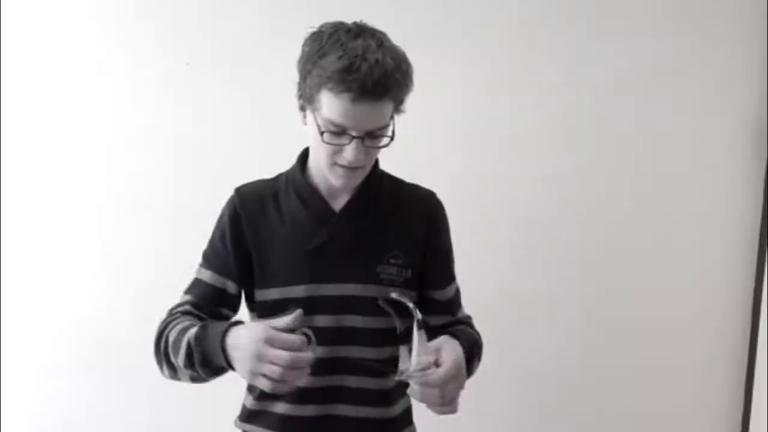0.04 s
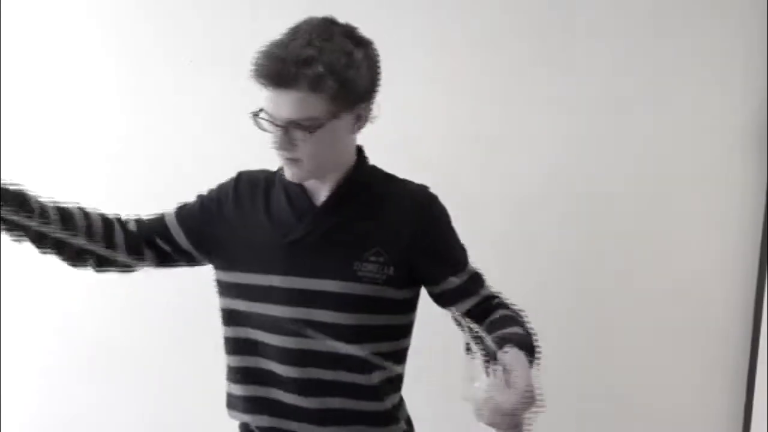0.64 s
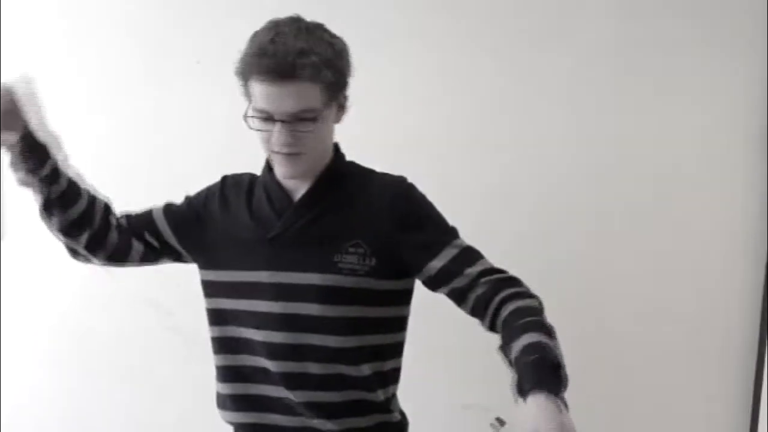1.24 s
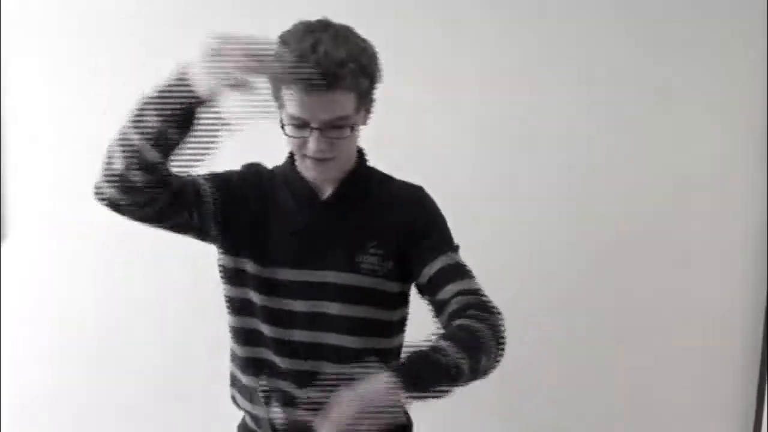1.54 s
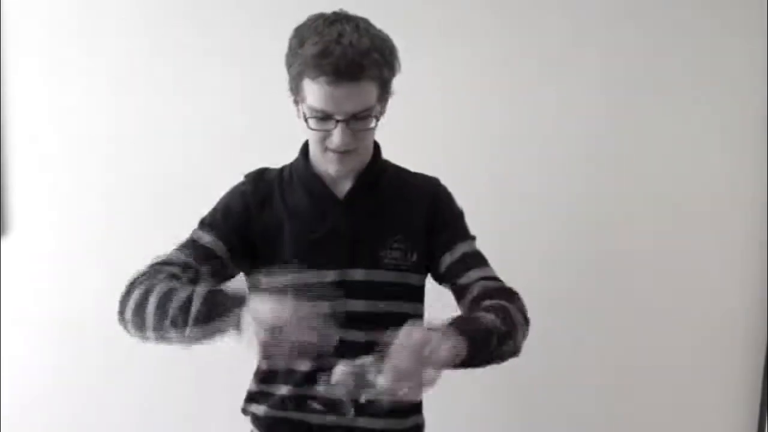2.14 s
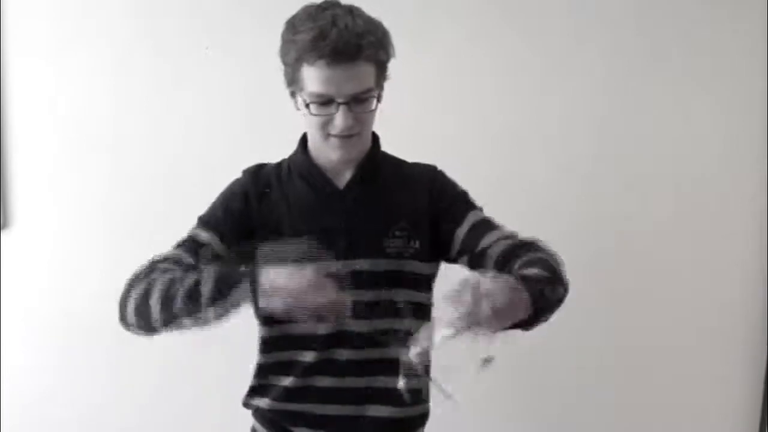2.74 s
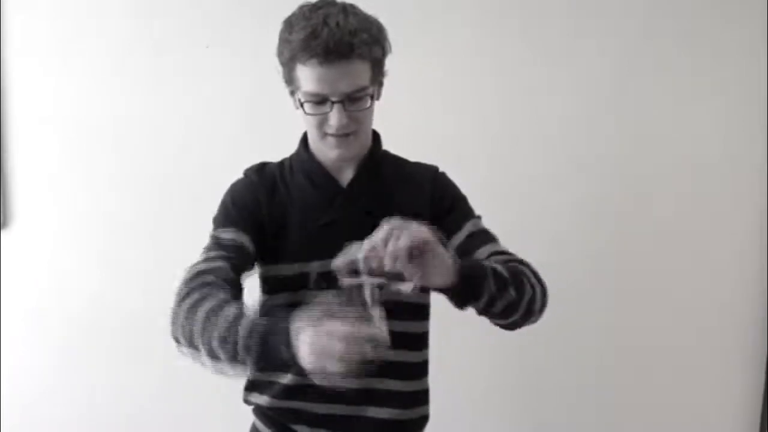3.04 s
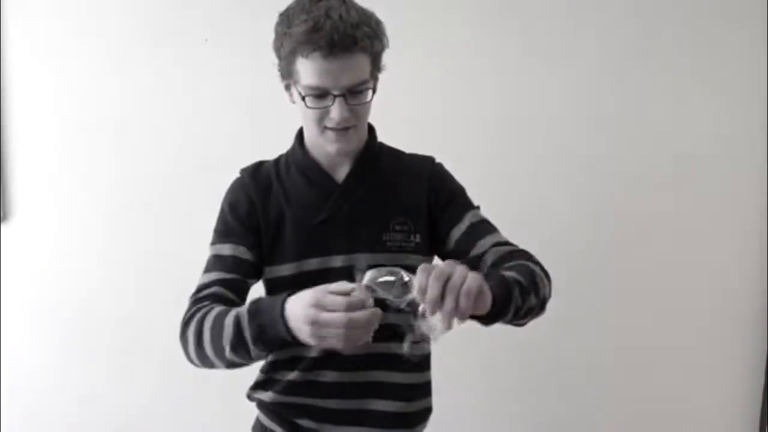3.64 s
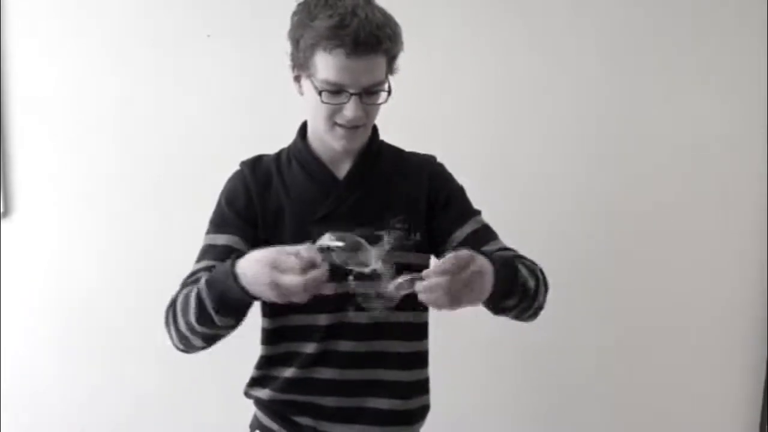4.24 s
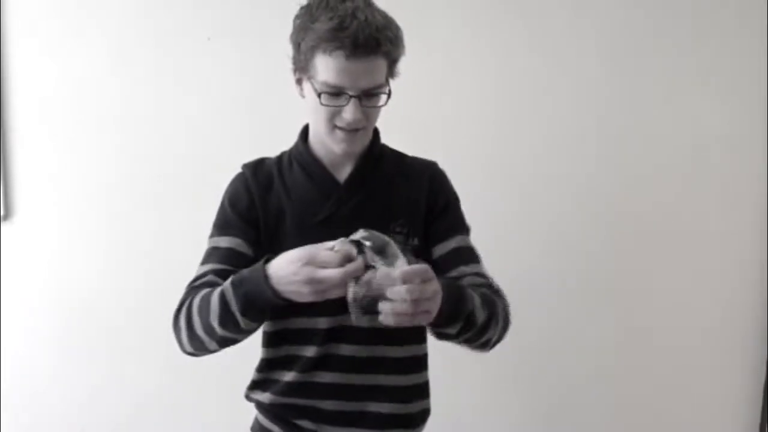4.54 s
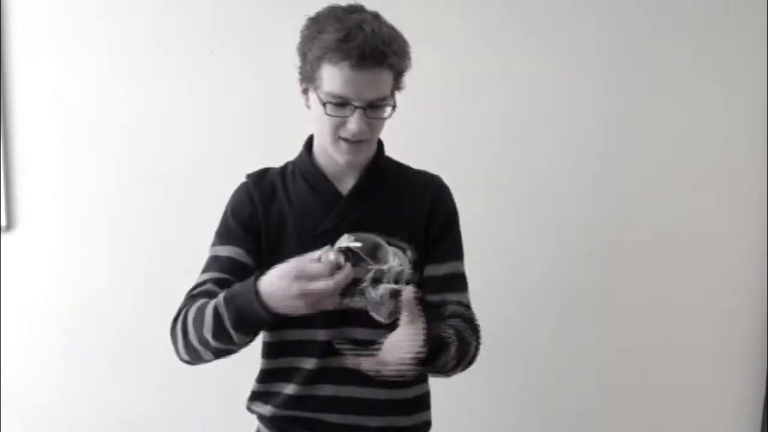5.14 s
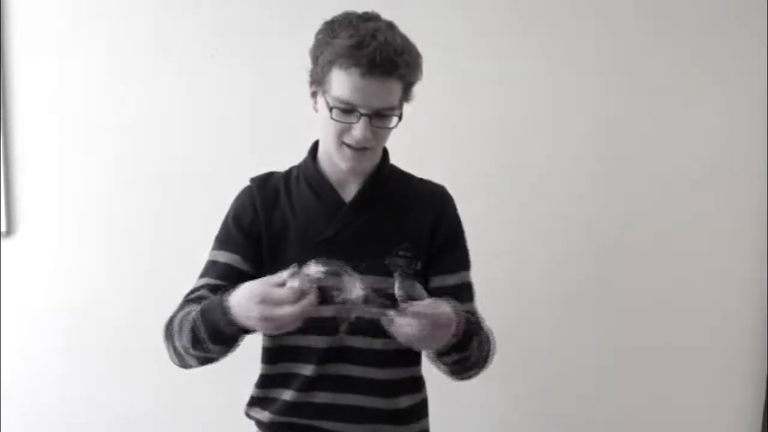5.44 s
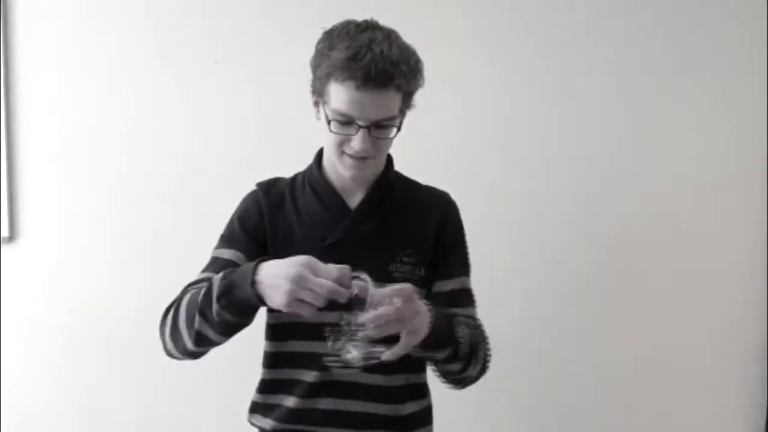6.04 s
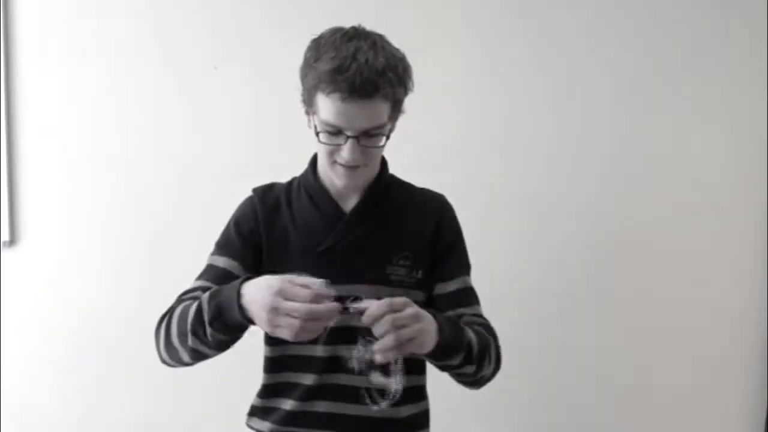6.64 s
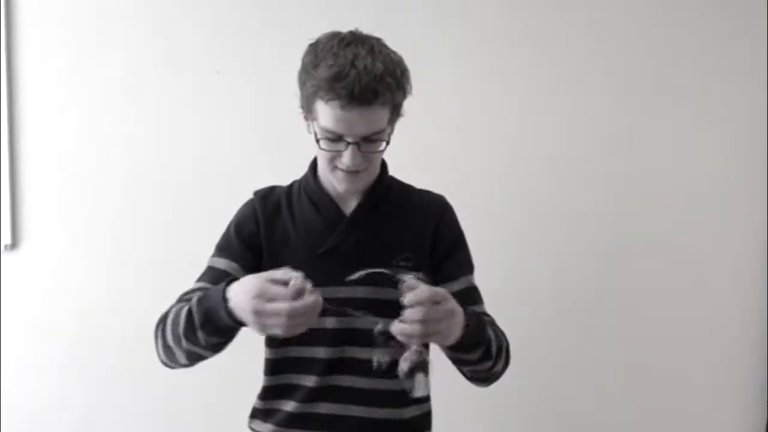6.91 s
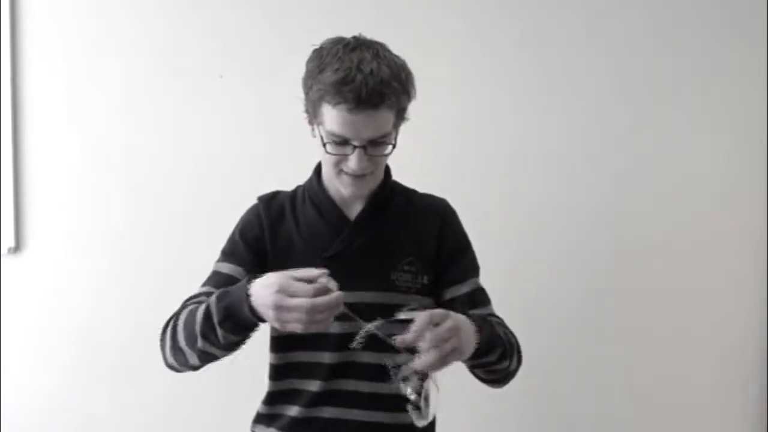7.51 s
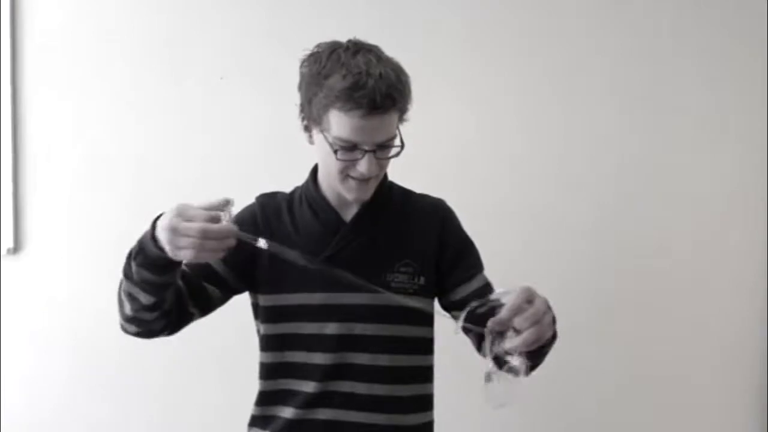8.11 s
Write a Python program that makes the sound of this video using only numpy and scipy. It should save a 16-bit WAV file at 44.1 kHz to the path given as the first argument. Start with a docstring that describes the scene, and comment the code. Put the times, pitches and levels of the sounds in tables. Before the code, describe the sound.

Two rasping pulls of sticky tape, separated by the crackle and snap of the loose strip being crumpled and unstuck.

```python
"""A bare room, one microphone close to the hands: adhesive tape is pulled off its roll twice.
The glue lets go in a train of tiny slips that shake the free strip, which sounds lower as it lengthens.
Between the pulls the loose film is crumpled and unstuck: it rustles, creaks, snaps and sometimes flaps.
Near walls throw back short echoes, over a faint room tone of hiss and low murmur."""
import sys
import numpy as np
from scipy import signal
from scipy.fft import rfft, irfft, next_fast_len
from scipy.io import wavfile
from scipy.ndimage import uniform_filter1d

SR = 44100
rng = np.random.default_rng(int(sys.argv[2]) if len(sys.argv) > 2 else 0)


def pcm_store(signal):
    """Save signal as 16-bit PCM."""
    levels = np.round(np.clip(np.atleast_2d(signal), -1, 1) * 32767)
    wavfile.write(sys.argv[1], SR, levels.astype(np.int16).T)


N = 364707
TIME = np.arange(N) / SR

# how hard the hand pulls, one curve a pull: t/s, level/dB, treble tilt/dB
EFFORT = [
    [(0.163, -36, -13), (0.169, -26, -6.5), (0.202, -23.5, -9), (0.423, -26, -0.5), (0.55, -32.5, -2.5),
     (0.8, -33, -5.5), (0.925, -55, -4)],
    [(7.568, -32, 11), (7.59, -32.5, 14), (7.655, -22, -7), (7.684, -27, -2), (7.705, -21, -1.5),
     (7.814, -22, -1.5), (7.87, -28, -9)],
]
# jerks, where the glue holds and then tears in a run of hard slips: t/s, level/dB, length/s
JERKS = [(0.451, -29.5, 0.011), (0.604, -30.5, 0.019), (0.691, -29, 0.013), (0.765, -29.5, 0.026),
         (0.802, -28.5, 0.034), (0.868, -29.5, 0.0078), (0.902, -28, 0.0074), (7.566, -29.5, 0.0048),
         (7.579, -20, 0.0055), (7.631, -25, 0.013), (7.701, -25, 0.0071), (7.746, -26, 0.011),
         (7.803, -27.5, 0.015)]


def amp(db):
    """Decibels to gain."""
    return 10 ** (np.asarray(db) / 20)


def unit(x):
    """Scales to an rms of one."""
    return x / np.sqrt(np.mean(x ** 2) + 1e-20)


def steadied(x, size=1100):
    """Holds the running rms at one, leaving the fine grain."""
    return x / np.sqrt(abs(uniform_filter1d(x ** 2, size)) + 1e-12)


def read(points, hz):
    """Reads a curve along a logarithmic frequency axis."""
    f, value = np.transpose(points)
    return np.interp(np.log(hz + 1), np.log(f + 1), value)


def add(mix, s, sound):
    """Mixes a sound in at time s."""
    part = mix[max(round(s * SR), 0):][:len(sound)]
    part += sound[:len(part)]


def colour(x, points, size=2048):
    """Causal filter of unit energy with the given spectral shape."""
    log_gain = np.log(amp(read(points, abs(np.fft.fftfreq(size, 1 / SR)))))
    minimum_phase = np.exp(np.conj(signal.hilbert(log_gain)))
    taps = np.fft.ifft(minimum_phase).real[:size // 2]
    return signal.oaconvolve(x, taps / np.linalg.norm(taps))[:len(x)]


def resonate(x, hz, width_hz):
    """A resonance of gain one whose pitch may follow a curve."""
    turn = np.exp(2j * np.pi * np.cumsum(hz * np.ones(len(x))) / SR)
    pole = np.exp(-np.pi * width_hz / SR)
    return 2 * (turn * signal.lfilter([1 - pole], [1, -pole], x / turn)).real


def low_cut(x, hz):
    """Gentle bass roll-off, 6 dB an octave."""
    return signal.sosfilt(signal.butter(1, hz, "high", fs=SR, output="sos"), x)


def wander(count, size):
    """Smooth random drift that turns about every size samples."""
    knots = rng.standard_normal(count // size + 2)
    return np.interp(np.arange(count) / size, np.arange(len(knots)), knots)


def room_tone(level_db=-63.5, drone_hz=195, drone_width_hz=14, drone=0.98):
    """Steady hiss and the low murmur of the room's air."""
    # colour of the quiet room: f/Hz, level/dB
    air_spectrum = [(15, -71), (25, -39), (101, -19.5), (152, -4), (246, -4.5), (322, -8.5), (433, -8.5),
                    (614, -13), (762, -15.5), (1020, -18), (1410, -17), (2850, -18), (3830, -15),
                    (14300, -22.5), (15500, -23.5)]
    air = colour(rng.standard_normal(N), air_spectrum)
    return amp(level_db) * unit(air + drone * resonate(air, drone_hz, drone_width_hz))


def room_response(tail_db=-4.0, early_db=-5, treble_db=-3, build_s=0.0022, echoes=14):
    """From hands to microphone: direct sound, echoes off near walls, a diffuse tail, standing waves."""
    # the room's decay: f/Hz, t60/s
    decay_times = [(150, 0.48), (400, 0.7), (1000, 0.61), (2700, 0.46), (7000, 0.48), (14000, 0.32)]
    # standing waves of the room: f/Hz, level/dB, t60/s
    modes = [(199.5, -58.5, 0.74), (255, -67, 0.357), (367.3, -59.5, 0.63)]
    t = np.arange(SR) / SR
    hz, frame_s, frames = signal.stft(rng.standard_normal(SR), SR, nperseg=256)
    tilt_db = read([(3000, 0.011), (14000, treble_db)], hz)[:, None]
    absorbed_db = 60 * frame_s / read(decay_times, hz)[:, None]
    tail = signal.istft(frames * amp(tilt_db - absorbed_db), SR, nperseg=256)[1][:SR]
    tail *= 1 - np.exp(-t / build_s)
    taps = amp(tail_db) * tail / np.linalg.norm(tail)
    echoes_s = rng.uniform(.002, .014, echoes)
    taps[(echoes_s * SR).astype(int)] += amp(early_db) * rng.choice([-1, 1], echoes) / np.sqrt(echoes)
    taps += sum(amp(db - 60 * t / t60) * np.sin(2 * np.pi * f * t) for f, db, t60 in modes)
    taps[0] += 1  # direct sound
    return taps


def room(x, places=5, stay_s=.09):
    """The hands keep moving, so the sound passes from one set of echoes to the next."""
    place = TIME / stay_s
    heard = np.zeros(N)
    for k in range(places):
        away = abs((place - k + places / 2) % places - places / 2)
        share = np.clip(.5 + 10 * (.5 - away), 0, 1)
        heard += signal.fftconvolve(x * share, room_response())[:N]
    return heard


def flaps():
    """Low swells of moved air and cloth."""
    # soft flaps of the hanging strip and sleeves: middle t/s, level/dB, length/s
    swings = [(0.04, -63, 0.62), (2.21, -68.5, 0.4), (2.842, -51.5, 0.16), (4.583, -60.5, 0.21),
              (4.81, -61, 0.17)]
    # colour of a flap: f/Hz, level/dB
    flap_spectrum = [(40, -41), (110, -14), (170, 0.5), (260, -6), (400, -24.5), (1000, -33), (4000, -69)]
    swell = sum(amp(db) * np.exp(-(2 * (TIME - s) / length) ** 2) for s, db, length in swings)
    return swell * unit(colour(rng.standard_normal(N), flap_spectrum))


def disperse(x, delay_s):
    """Bending waves in thin film: highs outrun lows, so a click chirps; delay_s holds at 1 kHz."""
    size = next_fast_len(len(x) + 1024)
    hz = np.fft.rfftfreq(size, 1 / SR)
    phase = 4 * np.pi * delay_s * np.sqrt(1000 * hz)
    return irfft(rfft(x, size) * np.exp(-1j * phase), size)[:len(x)]


def handling(holding_db=-82.5):
    """How strongly the fingers work the film: each grip swells and eases off to a light hold."""
    # grips, in which the fingers rub and crumple the film: middle t/s, level/dB, length/s
    grips = [(0.01, -61, 0.084), (1.78, -68, 0.072), (2.522, -53, 0.1), (2.812, -56.5, 0.16),
             (3.064, -45, 0.067), (3.448, -64.5, 0.15), (3.737, -63, 0.31), (3.996, -58.5, 0.27),
             (4.215, -57.5, 0.17), (4.454, -59.5, 0.49), (4.764, -62.5, 0.23), (5.438, -54, 0.088),
             (6.112, -47, 0.14), (6.384, -63, 0.33), (6.612, -58, 0.068), (6.728, -47, 0.068),
             (6.98, -63, 0.1), (7.522, -62, 0.089)]
    power = sum(amp(db) ** 2 / (1 + (2 * (TIME - s) / length) ** 2) ** 2 for s, db, length in grips)
    return np.sqrt(power + amp(holding_db) ** 2)


def rustle(per_s=150, spread_db=5, rub=0.11):
    """Countless small creases over a soft rub, while the fingers work the film."""
    # colour of the crumpled film: f/Hz, level/dB
    film_spectrum = [(410, -32), (700, -6.5), (861, -9), (943, -8), (2430, 1), (4700, 0.5), (10100, -6),
                     (14500, -8.5), (15500, -23)]
    folds = rng.random(N) < per_s / SR
    sizes = amp(spread_db * np.minimum(rng.exponential(1, N), 3))
    creases = folds * sizes * rng.choice([-1, 1], N)
    film = disperse(creases + rub * rng.standard_normal(N), delay_s=0.000587)
    return handling() * unit(colour(film, film_spectrum))


def slips(per_s, jitter, spread_db):
    """Stick-slip: one click of uneven size each time the tension beats the glue."""
    count = len(per_s)
    turns = np.cumsum(per_s * np.exp(jitter * wander(count, size=60))) / SR
    lets_go = np.diff(np.floor(turns), prepend=-1) > 0
    return lets_go * amp(spread_db * np.clip(rng.standard_normal(count), -1.5, 1.5))


def film_tone(s, level_db, length, first_hz, last_hz, width_hz, per_s=900, size=16384):
    """Fine clicks sound a patch of film whose pitch glides: a creak, a hum or the ring of a snap."""
    done = np.minimum(np.arange(size) / (SR * length), 1)
    hz = first_hz + (last_hz - first_hz) * done
    clicks = slips(np.full(size, per_s), jitter=.7, spread_db=1.5) * rng.choice([-1, 1], size)
    clicks = low_cut(clicks, first_hz / 2)
    film = unit(resonate(resonate(clicks, hz, width_hz), hz, width_hz))
    return s, amp(level_db) * film * np.sqrt(abs(np.sin(np.pi * done)))


def snap(s, strength_db, ring_hz, body_db, treble_db, crack=0.55, ring=1.14, ring_width_hz=330,
         per_s=2500, fizz=0.25, strain_s=0.009, strain_db=-15, size=4096):
    """A crease pops through, then smaller buckles crackle away while the patch of film rings."""
    # colour of a popping crease: f/Hz, level/dB
    snap_spectrum = [(80, -31.5), (250, 6.5), (700, 0), (1500, -1.5), (3000, -3.5), (6500, -4), (10000, -7),
                     (15500, -17)]
    t = np.arange(size) / SR
    crackle_s = 0.0049 * amp(-0.33 * strength_db)  # the harder it pops, the sooner it is over
    buckles = rng.standard_normal(size) * ((rng.random(size) < per_s / SR) + fizz)
    buckles *= np.exp(-t / crackle_s)
    drive = buckles / np.linalg.norm(buckles)
    drive[0] += crack
    lead = size // 8  # samples ahead of the pop, where the crease strains and fizzes
    drive = irfft(np.exp(1j * np.angle(rfft(np.roll(drive, lead)))))  # the tearing favours no pitch
    strain = np.clip(1 - (lead / SR - t) / strain_s, 0, 1) * (np.arange(size) < lead)
    drive += amp(strain_db) * rng.standard_normal(size) * np.sqrt(strain / strain.sum())
    shelves = [(900, body_db), (2200, 0), (6500, 0.0024), (11000, treble_db)]
    film = colour(drive, [(hz, db + read(shelves, hz)) for hz, db in snap_spectrum])
    film += ring * resonate(film, ring_hz, ring_width_hz)
    film[:lead] *= np.linspace(0, 1, lead) ** 2
    return s - lead / SR, amp(strength_db) * film / np.linalg.norm(film)


def faint_snaps(per_s=7, over_rustle_db=31, most_db=-25, spread_db=7,
                low_hz=2000, high_hz=6500, body_db=-11, treble_db=5.0):
    """Rows of small snaps at random moments, their strength following the grip that causes them."""
    when, weakness, patch = rng.random((round(per_s * N / SR), 3)).T
    grip_db = 20 * np.log10(handling()[(when * N).astype(int)])
    strength_db = np.minimum(grip_db + over_rustle_db, most_db) - spread_db * weakness
    ring_hz = low_hz * (high_hz / low_hz) ** patch
    return [(s, db, hz, body_db, treble_db) for s, db, hz in zip(when * N / SR, strength_db, ring_hz)]


def peel(index, t):
    """Slip rate, drifting with the arm's speed, and the strip's resonance, sinking as it grows."""
    # the arm's travel, one row a pull: first slip rate/Hz, last slip rate/Hz,
    # first resonance f/Hz, resonance at full reach f/Hz, time the arm takes to slow/s
    travels = [(2142, 175, 980, 160.5, 0.45), (520.4, 760, 925, 202, 0.101)]
    first_per_s, last_per_s, first_hz, reach_hz, slowing_s = travels[index]
    start, end = EFFORT[index][0][0], EFFORT[index][-1][0]
    since = np.clip(t - start, 0, end - start)
    per_s = first_per_s * (last_per_s / first_per_s) ** (since / (end - start))
    share_of_reach = 1 - (1 - reach_hz / first_hz) * np.exp(-since / slowing_s)
    return per_s, reach_hz / share_of_reach


def jerk(s, level_db, length, pace=.8, size=4096):
    """A short buzz of separate, hard slips, a little slower than the peel around it."""
    # colour of a hard slip: f/Hz, level/dB
    slip_spectrum = [(100, -25), (400, -24.5), (1400, -5.5), (2800, -0.5), (4300, -2), (6000, -11),
                     (9500, -7), (13500, -12.5), (16000, -16)]
    nearest_pull = np.argmin([abs(s - curve[0][0]) for curve in EFFORT])
    per_s = pace * peel(nearest_pull, s)[0]
    clicks = unit(slips(np.full(size, per_s), jitter=.4, spread_db=2))
    lasting = np.clip((length - np.arange(size) / SR) * per_s, 0, 1)
    buzz = disperse(low_cut(clicks * lasting, 130), delay_s=0.000672)
    return s, amp(level_db) * colour(buzz, slip_spectrum)


def pull(index, fizz=0.033, ring=2.18, ring_width_hz=55, sway=0.067, treble_hz=6000,
         cut_db_per_octave=11, flutter_db=1.0, surge_db=-3, surge_s=0.018):
    """Slips shake the free strip, which radiates little below its lowest resonance."""
    # colour of the peeling strip: f/Hz, level/dB
    strip_spectrum = [(35, -86), (60, -50), (145, -16.5), (192, -7.5), (368, -8), (657, -11), (869, -7),
                      (1120, -6.5), (2410, -2), (3190, -4), (12900, -15), (15500, -21.5)]
    effort_s, level_db, bright_db = np.transpose(EFFORT[index])
    start = effort_s[0]
    t = start + np.arange(SR) / SR
    per_s, strip_hz = peel(index, t)
    strip_hz *= np.exp(sway * wander(SR, size=1500))  # the tension is never steady
    glue = slips(per_s, jitter=.6, spread_db=4.5) + fizz * rng.standard_normal(SR)
    strip = colour(disperse(low_cut(glue, 130), delay_s=0.000901), strip_spectrum)
    strip += ring * sum(resonate(strip, k * strip_hz, ring_width_hz) / k for k in range(1, 4))
    hz, frame_s, frames = signal.stft(strip, SR, nperseg=512)
    octaves_below = np.log2(np.interp(start + frame_s, t, strip_hz) / (hz[:, None] + 1))
    cut_db = cut_db_per_octave * np.clip(octaves_below, 0, 1.5)
    treble_shelf = hz ** 2 / (hz ** 2 + treble_hz ** 2)
    tilt_db = np.interp(start + frame_s, effort_s, bright_db) * treble_shelf[:, None]
    strip = signal.istft(frames * amp(tilt_db - cut_db), SR, nperseg=512)[1][:SR]
    # after a jerk the freed tape peels faster for a moment, heard as a surge in level
    surge = sum(amp(db + surge_db) * (t > s) * np.exp(-abs(t - s) / surge_s) for s, db, _ in JERKS)
    level = np.hypot(amp(np.interp(t, effort_s, level_db)), surge)
    flutter = amp(flutter_db * wander(SR, size=400))
    pulling = uniform_filter1d(1. * (t < effort_s[-1]), size=300)
    return start, steadied(strip) * level * flutter * pulling


def scene():
    """All the sounds of the tape at the close microphone, with the room behind them."""
    # loud snaps of the loose film: t/s, strength/dB, ring f/Hz, body/dB, treble/dB
    loud_snaps = [(2.015, -17, 3920, -13.5, -3), (2.43, -11, 3050, -15.5, 3), (2.734, -22.5, 4070, -11, 4),
                  (2.875, -8, 2900, -22.5, -3), (3.043, -5, 4950, -20.5, -3), (3.299, -28.5, 1730, -6, 3),
                  (3.643, -23.5, 3360, -39, -2), (3.743, -26, 1700, -15, 4), (3.999, -23.5, 3740, -8.5, -3),
                  (4.136, -22.5, 7000, -16, 2), (4.161, -20, 6460, -13, -3), (4.194, -17, 4320, -21, -1),
                  (4.32, -17, 4560, -9.5, -1.5), (4.521, -20, 4720, -5.5, -2),
                  (4.598, -20.5, 3240, -8, 4.5), (4.638, -21, 3530, -23, -20),
                  (4.755, -24.5, 3260, -23, 12), (4.904, -24.5, 2020, -14, -4),
                  (5.008, -27.5, 4500, -7.5, -3), (5.358, -23.5, 8060, -10, -2),
                  (5.447, -16.5, 2700, -12.5, 1), (5.486, -12, 4300, -25, 7), (5.889, -28.5, 5710, -16, 9),
                  (5.949, -19.5, 4600, -13, -1), (6.009, -1.5, 4700, -28, -4),
                  (6.163, -10.5, 4530, -19.5, 1.5), (6.525, -20.5, 6730, -22, 5),
                  (6.639, -10.5, 9200, -35, 12), (6.691, -6, 5540, -19.5, 3), (6.754, -6, 3980, -12, 1),
                  (6.929, -17.5, 2130, -18, -7), (6.962, -8, 1590, -18.5, -2), (7.267, -26.5, 4340, -15, 1),
                  (7.495, -22, 2080, -27, -2)]
    # creaks of the film, a low tone that sets the room's standing wave humming, and the brief ringing of three
    # loud snaps: # t/s, level/dB, length/s, first f/Hz, last f/Hz, width/Hz
    tones = [(0.24, -33.5, 0.23, 695, 840, 795), (0.776, -51.5, 0.25, 191, 195, 40),
             (0.787, -45, 0.11, 2680, 2690, 1800), (2.869, -50, 0.03, 2740, 2750, 170),
             (3.039, -39, 0.011, 1520, 1430, 700), (3.861, -62.5, 0.17, 1910, 2510, 1900),
             (5.324, -62, 0.11, 750, 1200, 800), (5.988, -43, 0.06, 3830, 4360, 4320),
             (6.007, -25.5, 0.0056, 6340, 6200, 2200), (6.34, -60, 0.068, 2200, 2070, 1100),
             (6.53, -49.5, 0.048, 5630, 6100, 7000), (6.721, -42.5, 0.037, 6000, 6000, 8600),
             (7.491, -57, 0.027, 2200, 2030, 280), (7.687, -22.5, 0.029, 2440, 2360, 700),
             (7.744, -25.5, 0.077, 1840, 1720, 970), (7.852, -35.5, 0.074, 1790, 1720, 600),
             (7.951, -63.5, 0.28, 1800, 1420, 972)]
    tape = rustle() + flaps()
    for index in range(len(EFFORT)):
        add(tape, *pull(index))
    for source, rows in (jerk, JERKS), (snap, loud_snaps), (film_tone, tones), (snap, faint_snaps()):
        for row in rows:
            add(tape, *source(*row))
    radiated = low_cut(tape, 120)  # thin film moves little air at low pitch
    at_microphone = low_cut(room(radiated), 70)
    return (at_microphone + room_tone())[None]


def record(dry):
    """The recorder's band limit."""
    edge_hz = 15700
    low_pass = signal.firwin(301, edge_hz, window=("kaiser", 9), fs=SR)
    return signal.oaconvolve(dry, low_pass[None], "same")


dry = scene()
out = record(dry)
pcm_store(out)
```